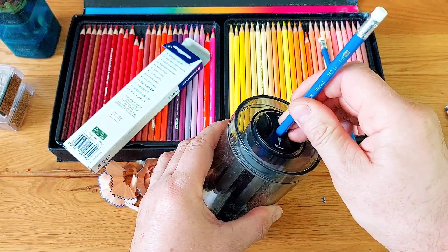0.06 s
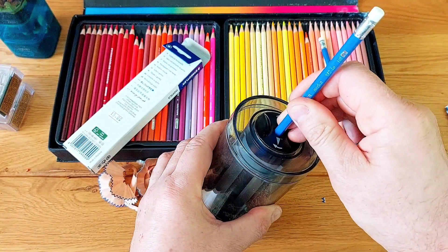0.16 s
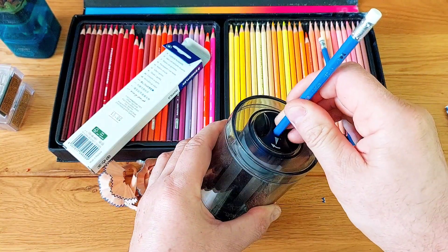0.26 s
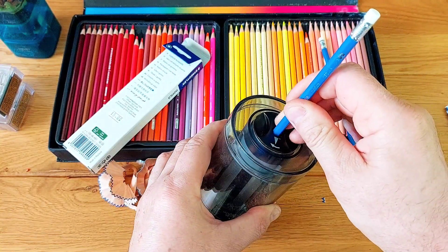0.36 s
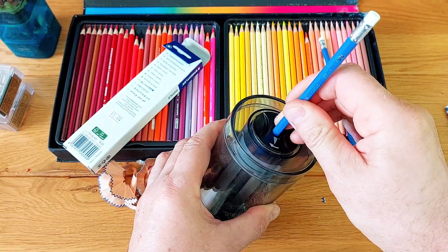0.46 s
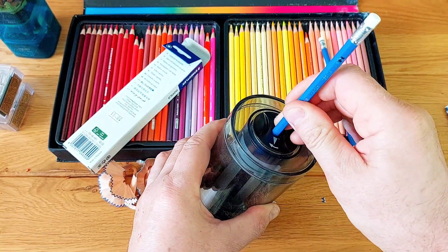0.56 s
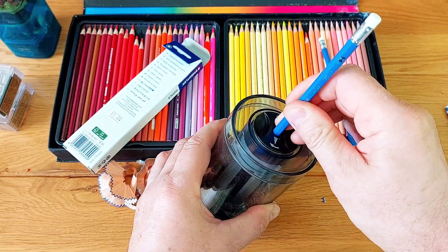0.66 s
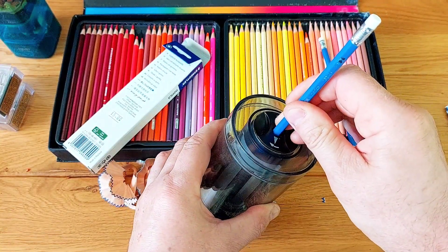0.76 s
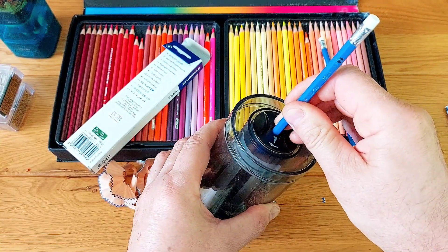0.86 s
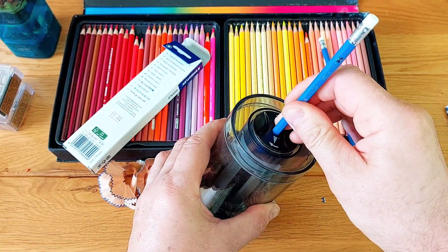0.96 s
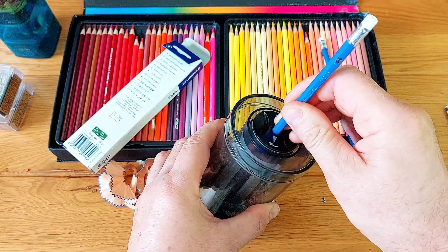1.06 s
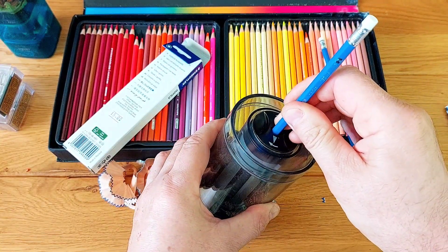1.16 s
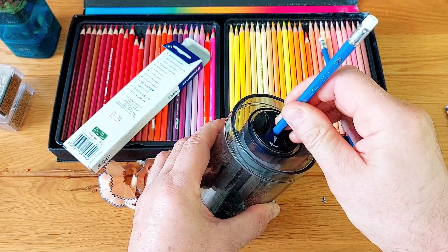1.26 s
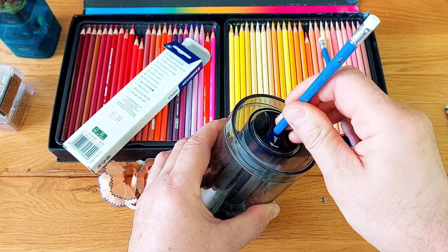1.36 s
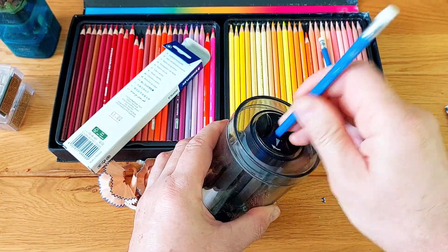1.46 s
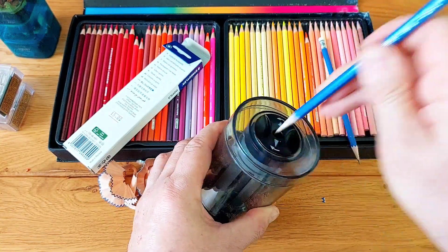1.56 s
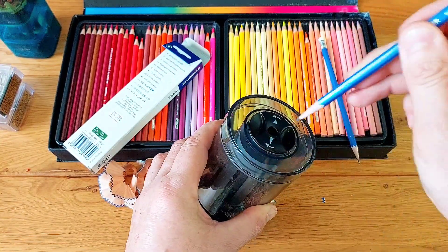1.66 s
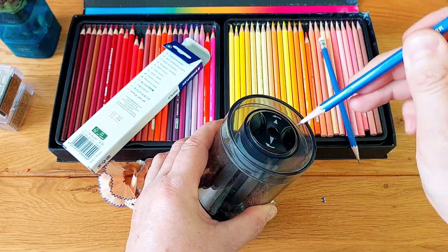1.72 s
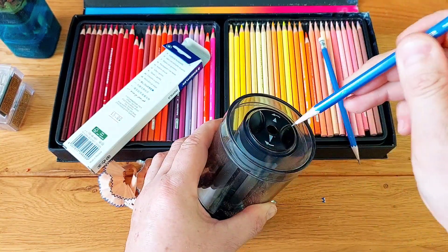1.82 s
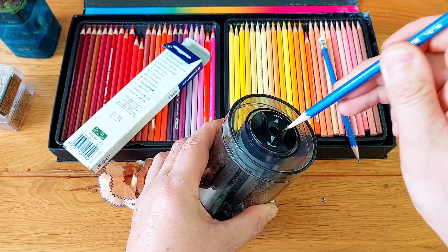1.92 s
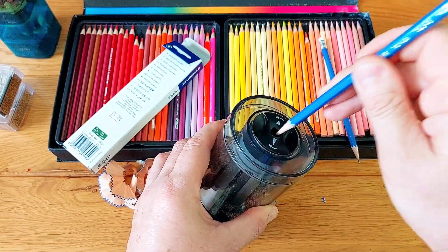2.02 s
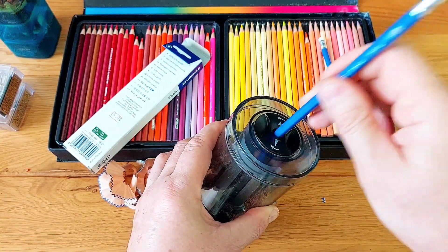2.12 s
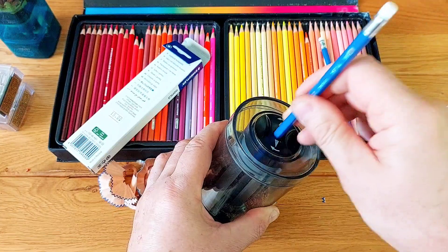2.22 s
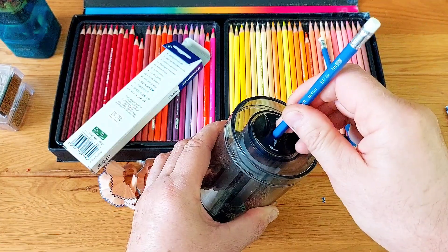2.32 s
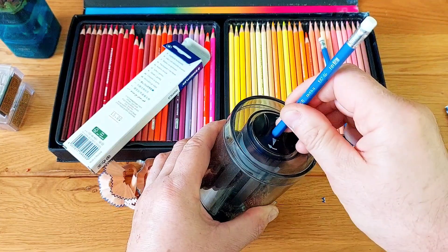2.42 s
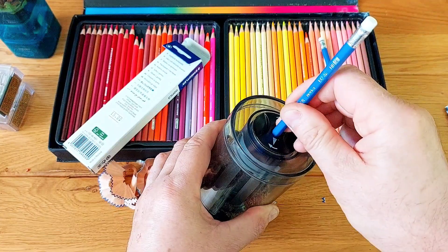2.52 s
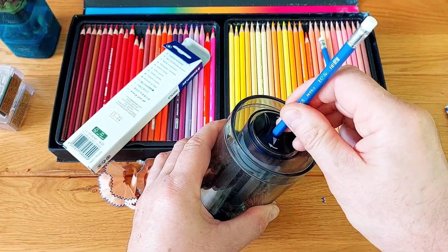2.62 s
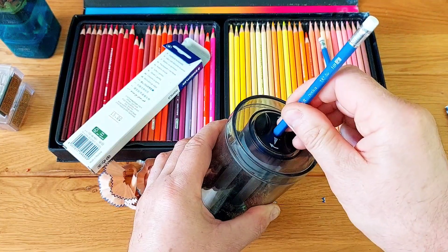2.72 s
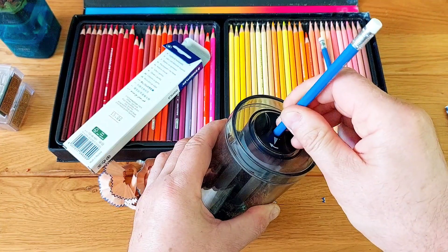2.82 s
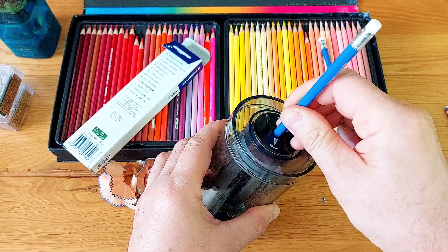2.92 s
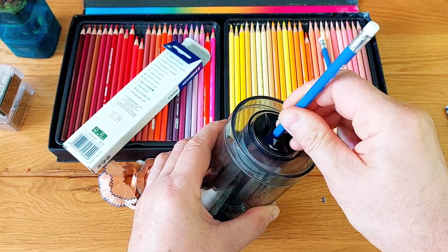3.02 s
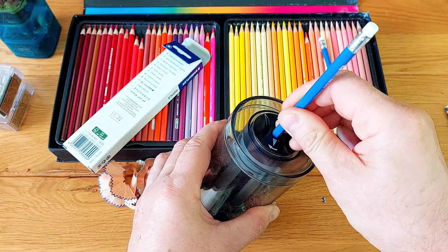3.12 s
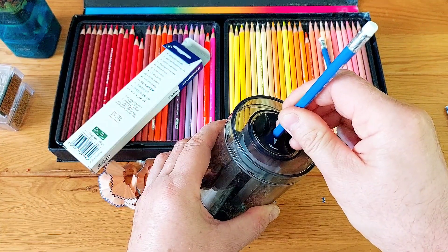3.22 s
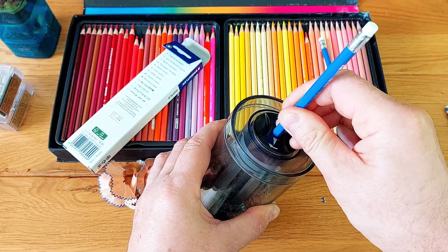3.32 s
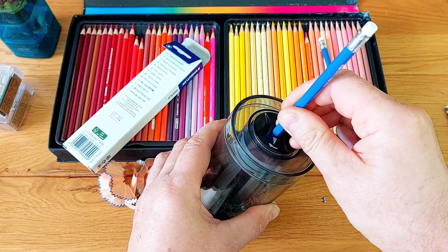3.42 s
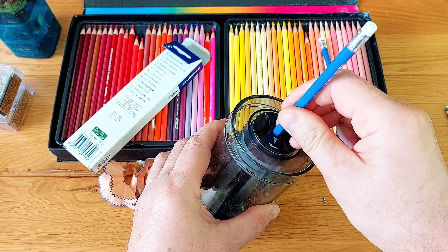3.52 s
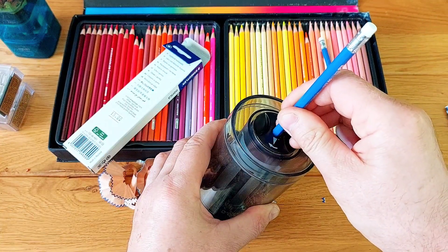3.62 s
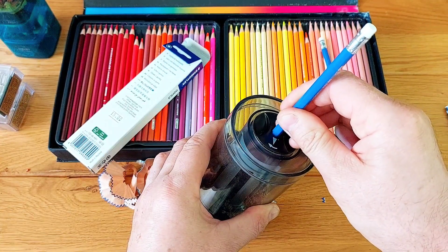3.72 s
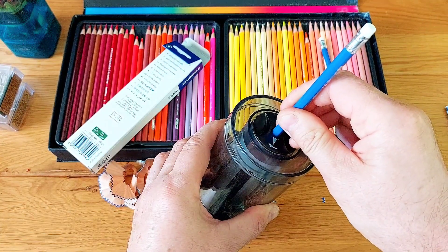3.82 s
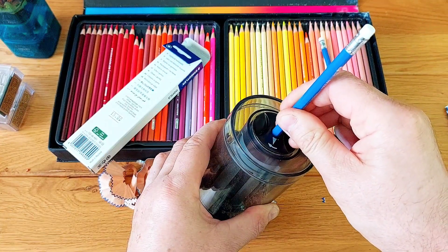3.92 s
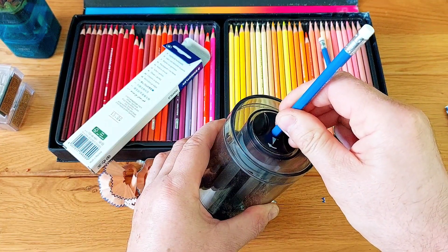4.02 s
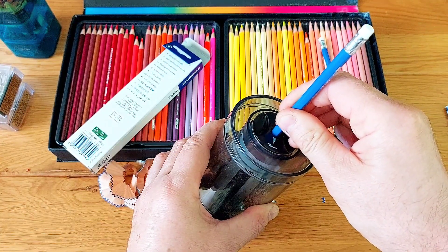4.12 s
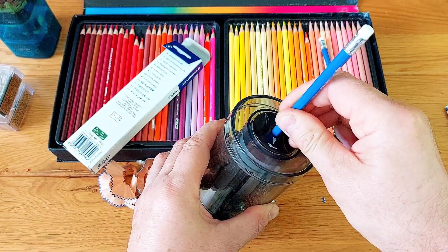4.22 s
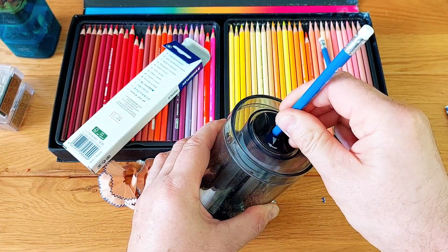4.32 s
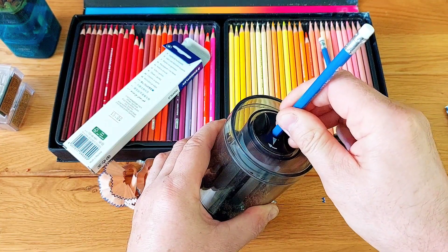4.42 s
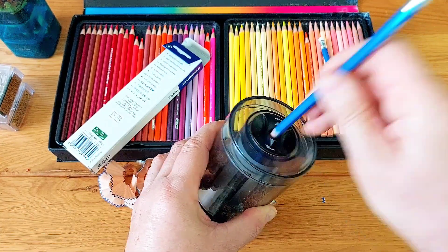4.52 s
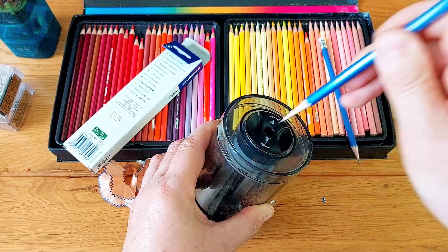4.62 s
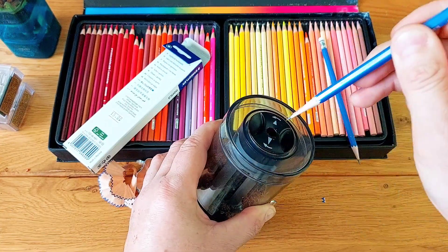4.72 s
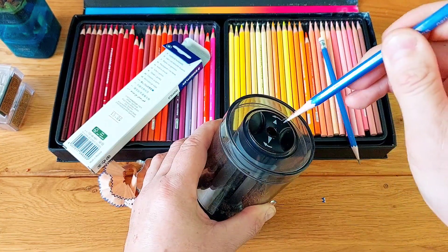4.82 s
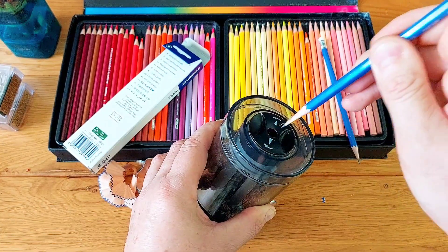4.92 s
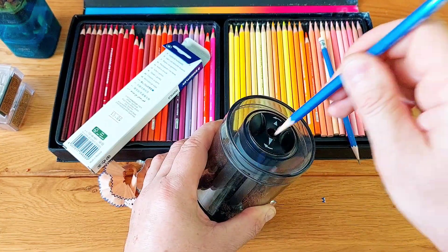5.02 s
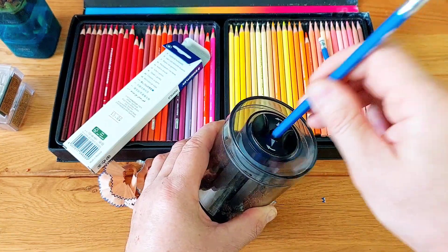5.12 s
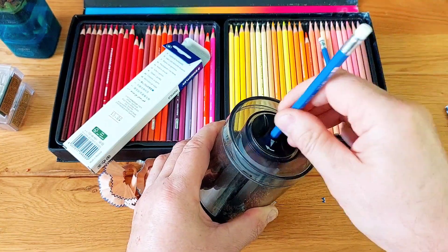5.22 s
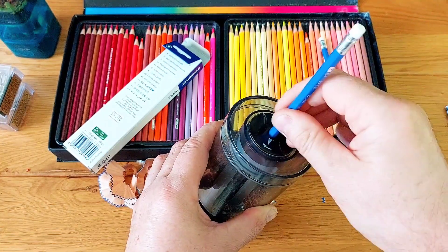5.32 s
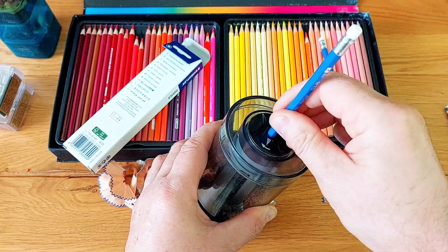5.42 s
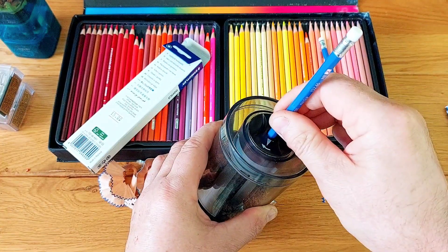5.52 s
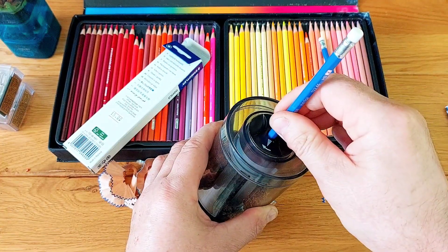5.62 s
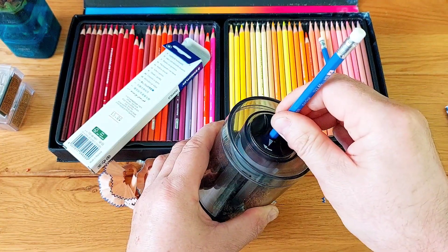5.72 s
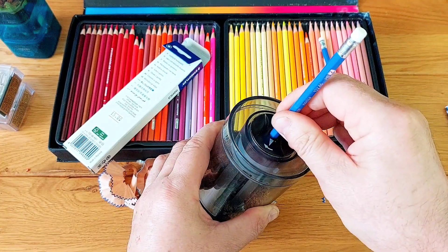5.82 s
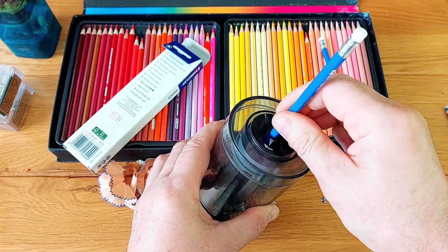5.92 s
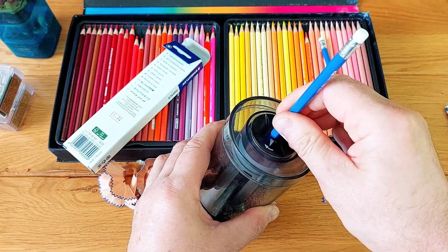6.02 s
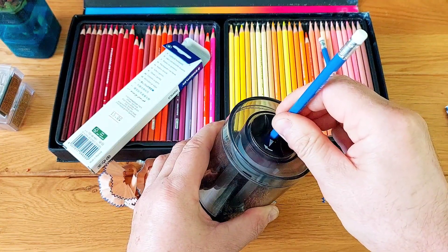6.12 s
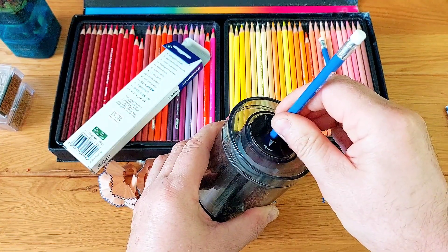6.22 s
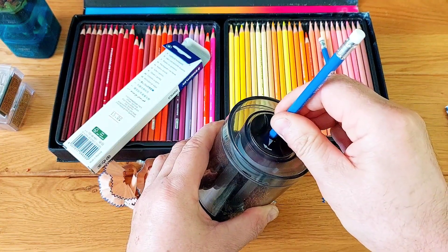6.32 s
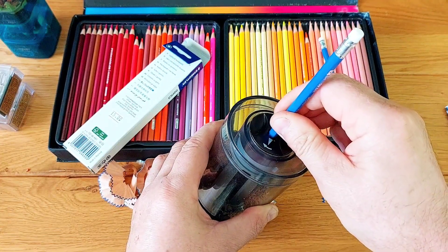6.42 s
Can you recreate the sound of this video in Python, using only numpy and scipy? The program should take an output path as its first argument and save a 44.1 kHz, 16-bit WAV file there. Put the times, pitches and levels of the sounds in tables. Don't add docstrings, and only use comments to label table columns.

```python
import sys
import numpy as np
from scipy import signal
from scipy.fft import rfft, irfft, next_fast_len
from scipy.io import wavfile
from scipy.ndimage import uniform_filter1d, map_coordinates

SR = 44100
rng = np.random.default_rng(int(sys.argv[2]) if len(sys.argv) > 2 else 0)


def decibels_to_gain(level_db):
    exponent = np.asarray(level_db, float) / 20
    return 10 ** exponent


def unload_wav(signal):
    wavfile.write(
        sys.argv[1],
        SR,
        np.round(np.clip(np.atleast_2d(signal).T, -1, 1) * 32767).astype(np.int16),
    )


N = 284886
T = np.arange(N) / SR

# t/s, peak level/dB,
# knock level/dB, mid level/dB, left-right/dB
TAPS = [(1.4057, -47, -68, -65, 0), (1.4216, -45, -37, -46, 1), (1.4787, -47, -57, -41, -3.5),
        (1.486, -41, -43, -35.5, 5), (1.5447, -36, -36, -49, 5), (1.5597, -45, -40, -50, -4),
        (1.5713, -32, -61, -41, -2), (1.8756, -62, -79.5, -86, 9), (2.016, -70, -65.5, -72.5, 13.5),
        (2.0253, -66, -60, -72.5, -9), (2.1488, -76, -60, -69, 0), (2.1722, -58, -67.5, -52, 1),
        (2.1863, -68, -36, -53, 2), (2.2675, -46, -56, -41, -2), (2.3006, -37, -31, -34, 4),
        (2.3194, -48, -47, -49.5, 3), (2.4405, -47.5, -66, -69, -7), (2.595, -54.5, -80, -70, -3),
        (2.7713, -20, -14, -29.5, 2.5)] + [(4.3346, -46, -41, -40, -3), (4.4184, -46, -62, -60, -3),
                             (4.4482, -62, -34.5, -44, 1), (4.4859, -40, -45, -38, 1),
                             (4.5134, -45.5, -64, -45, -0.5), (4.5328, -29, -47.5, -31, 0.5),
                             (4.5456, -28, -19.5, -29.5, 4), (4.604, -29.5, -43, -40, -0.5),
                             (5.163, -69, -69, -66, 1), (5.1866, -54, -62, -52, 0),
                             (5.197, -62, -59, -43, 0), (5.258, -38.5, -55, -38.5, 4.5),
                             (5.3303, -71.5, -40.5, -58, 1.5), (5.3829, -51, -51, -63, -4.5),
                             (5.7528, -54.5, -65.5, -76.5, 2)]
# f/Hz, width/Hz, level/dB
SOCKET = [(255, 44, 1.5), (183, 46, 0), (332, 60, -7)]
# f/Hz, width/Hz, level/dB
WOOD = [(830, 390, -2), (1630, 61, 3.5), (1923, 450, -6.5), (2950, 600, -6), (3880, 420, -6)]
# f/Hz, width/Hz, level/dB
RIM = [(5680, 2700, -2), (7550, 220, 0.5), (10400, 5400, -12.5), (13550, 2500, -7.5)]


def unit(x):
    return x / np.sqrt(np.mean(x ** 2) + 1e-20)


def along(points, hz):
    f, v = np.transpose(points)
    return np.interp(np.log(hz + 1), np.log(f + 1), v)


def wobble(rate):
    knots = rng.standard_normal(int(N * rate / SR) + 4)
    return map_coordinates(knots, [T * rate])


def filtered(x, response):
    m = next_fast_len(N + SR // 2)
    return irfft(rfft(x, m) * response(np.fft.rfftfreq(m, 1 / SR)), m)[..., :N]


def resonant(x, modes, fill_db=-150, low_hz=30, high_hz=20000):
    # f/Hz, correlation
    alike = [(100, 0.97), (350, 0.95), (700, .86), (1400, 0.68), (2800, 0.45), (5600, 0.25), (10000, 0.12),
             (15000, 0.15)]

    def body(f):
        total = decibels_to_gain(fill_db)
        for k, (centre, width, db) in enumerate(modes):
            mode = 1j * f * width / (centre * centre - f * f + 1j * f * width)
            total = total + (-1) ** k * decibels_to_gain(db) * mode
        return total / np.sqrt((1 + (low_hz / (f + 1)) ** 6) * (1 + (f / high_hz) ** 6))

    def response(f):
        turn = np.arccos(np.clip(along(alike, f), -1, 1)) / 2
        return body(f) * [np.cos(turn), np.sin(turn)]

    mid, side = filtered(x, response)
    return np.array([mid + side, mid - side])


def grit(per_s, spread_db):
    clicks = rng.random(N) < per_s / SR
    return clicks * decibels_to_gain(spread_db * rng.exponential(size=N)) * rng.standard_normal((2, N))


def controls(tables, outside):
    total = outside
    for table in tables:
        s, *columns = np.transpose(table)
        total = total + np.array([np.interp(T, s, c - outside, 0, 0) for c in columns])
    return total


def speed():
    # t/s, gear mesh f/Hz, whine level/dB
    course = [
        [(0, 1950, -35), (1.06, 1950, -36), (1.09, 1800, -39), (1.112, 1600, -33), (1.135, 1250, -40),
         (1.145, 1000, -48), (1.2, 600, -70)],
        [(2.73, 1270, -55), (2.752, 1280, -33), (2.785, 1480, -31), (2.805, 1850, -42), (2.83, 1950, -33),
         (4.16, 1950, -38), (4.192, 1840, -39), (4.21, 1600, -34), (4.235, 1400, -44), (4.29, 900, -62)],
        [(5.885, 1238, -55), (5.905, 1238, -36), (5.955, 1560, -35), (6.0, 1650, -40), (6.05, 1450, -35),
         (6.09, 1520, -31), (6.125, 1771, -40), (6.17, 1790, -40), (6.195, 1950, -36), (6.46, 1950, -35)],
    ]
    # t/s, overspeed/Hz, drag/s, sag/Hz, whine level/dB
    cutter_turns = [(.015, 95, .031, 60, 0), (.076, 130, .054, 170, -1), (.174, 85, .046, 135, 1),
                    (.25, 30, .047, 205, 0), (.343, 65, .036, 105, 1), (.419, 70, .044, 220, 1),
                    (.509, 30, .044, 195, 1), (.585, -45, .04, 125, 0), (.674, 22, .044, 135, 1),
                    (.758, 22, .042, 105, 1), (.83, 10, .066, 210, 3), (.944, -32, .03, 58, 0),
                    (1.014, 42, .045, 130, 1), (2.864, 60, .094, 210, 4), (3.01, -30, .028, 30, 1),
                    (3.088, 150, .033, 150, 0), (3.141, 50, .056, 250, 2), (3.235, -30, .06, 25, 1),
                    (3.325, 62, .036, 75, 2), (3.393, 135, .052, 270, 1), (3.479, -20, .037, 85, -1),
                    (3.568, 78, .042, 115, 1), (3.658, 100, .035, 65, 1), (3.73, 62, .048, 240, 1),
                    (3.818, 0, .066, 62, 1), (3.908, 15, .021, 55, 0), (3.983, 138, .04, 270, 2),
                    (4.059, -20, .038, 220, -2), (6.208, 48, .038, 70, 2), (6.286, 85, .05, 200, 1),
                    (6.357, -18, .045, 150, 1)]
    free_s, idle_s = .04, .2
    s, hz, whine_db = np.transpose(np.vstack(course))
    start, over_hz, drag, sag_hz, turn_db = np.transpose(cutter_turns)
    caught = start + drag
    gap = np.diff(start, append=np.inf) > idle_s
    knots = np.concatenate([start, caught, caught[gap] + free_s, start[1:][gap[:-1]] - free_s])
    order, rest = np.argsort(knots), np.zeros(2 * gap.sum() - 1)

    def ripple(at_start, at_sag):
        return np.interp(T, knots[order], np.concatenate([at_start, at_sag, rest])[order])

    running_db = controls([np.array(burst)[:, [0, 2]] for burst in course], -150)[0]
    mesh_hz = np.interp(T, s, hz) + ripple(over_hz, over_hz - sag_hz)
    return mesh_hz, running_db + ripple(turn_db, turn_db - 2.5)


def gears():
    # f/Hz, level/dB
    cap = [(2000, -12.5), (3200, -1), (3650, 1), (4200, 3), (4900, 0.5), (5400, 3), (6100, -8), (7000, -15)]
    hz, whine_db = speed()
    hz = uniform_filter1d(hz, size=500)
    load = -np.tanh(np.gradient(hz) * SR / 1800)
    cycles = np.cumsum(hz * (1 + .011 * wobble(110))) / SR
    first = decibels_to_gain(5 * np.minimum(load, .3)) * decibels_to_gain(whine_db)
    octave = first * decibels_to_gain(-36 * (1 - hz / hz.max()))
    levels = [first, octave * decibels_to_gain(along(cap, 2 * hz)), decibels_to_gain(0.5) * octave * decibels_to_gain(along(cap, 3 * hz))]
    runout = 1 + .3 * np.sin(2 * np.pi * cycles / 10.3)
    lead = np.array([[1], [-1]]) * (0.42 + 0.39 * wobble(16))
    whine = 0
    for k, level in enumerate(levels):
        flutter = decibels_to_gain(3.2 * wobble(85) - .5)
        whine = whine + level * flutter * np.sin(2 * np.pi * (k + 1) * cycles + (-1) ** k * lead)
    return cycles, decibels_to_gain(5.5) * runout * whine


def bites():
    # t/s, peak level/dB
    blade_bites = [(0.0248, -16), (0.0498, -18.5), (0.0897, -19.5), (0.1296, -17), (0.1506, -23.5), (0.1725, -24),
                   (0.1895, -21.5), (0.2084, -18.5), (0.2359, -17.5), (0.2808, -16.5), (0.3012, -16.5),
                   (0.3436, -17), (0.4065, -17.5), (0.4244, -14), (0.4544, -18.5), (0.4723, -20.5), (0.5033, -19),
                   (0.5172, -16.5), (0.5357, -17), (0.5611, -19.5), (0.5776, -19), (0.599, -15), (0.619, -17),
                   (0.6424, -20.5), (0.6659, -19), (0.6923, -14.5), (0.7572, -15.5), (0.815, -15), (0.8345, -17),
                   (0.8699, -17), (0.8939, -19), (0.9163, -25), (0.9373, -20.5), (0.9577, -17.5), (1.0101, -17),
                   (1.061, -17), (1.0859, -16.5), (1.1348, -24.5),
                   (2.7588, -20), (2.7842, -18.5), (2.806, -16.5), (2.848, -15), (2.8683, -17), (2.9125, -19),
              (2.9319, -14), (2.9631, -20), (2.9818, -17.5), (3.0047, -20), (3.0287, -17), (3.1, -15),
              (3.1268, -18.5), (3.146, -19), (3.1644, -18), (3.1812, -19), (3.2339, -18), (3.2527, -16.5),
              (3.311, -19), (3.3327, -20), (3.3904, -20), (3.4063, -16), (3.4245, -16), (3.4742, -18.5),
              (3.4989, -15.5), (3.5625, -13), (3.6164, -17.5), (3.6442, -15), (3.6842, -15),
              (3.7052, -17.5), (3.7286, -17.5), (3.7491, -18.5), (3.777, -22), (3.795, -24), (3.8174, -18),
              (3.8379, -18.5), (3.8559, -20.5), (3.8918, -16.5), (3.9482, -19.5), (3.9686, -19.5),
              (3.9843, -20), (4.0039, -17.5), (4.0228, -14), (4.0591, -19), (4.0805, -16.5),
              (4.1174, -20.5), (4.1413, -19), (4.207, -21.5), (4.228, -25),
                   (5.9094, -22), (5.9383, -19.5), (5.9603, -17.5), (5.9827, -17), (6.0211, -14.5), (6.054, -17.5),
            (6.081, -21), (6.1103, -14.5), (6.1314, -12), (6.1947, -18.5), (6.2172, -17.5), (6.3044, -18),
            (6.3214, -17.5), (6.358, -19.5), (6.3803, -16.5), (6.3977, -15.5), (6.4436, -17.5)]
    bite_s, between = 0.01, 0.85
    s, db = np.transpose(blade_bites)
    u = np.arange(round(3 * bite_s * SR)) / (bite_s * SR / 4)
    marks = np.bincount((s * SR).astype(int), decibels_to_gain(db + 14.5), minlength=N)[:N]
    swell = signal.fftconvolve(marks, u * np.exp(1 - u))[:N]
    return 20 * np.log10(between + abs(swell))


def shell_hum(cycles, shake, shake_db):
    # f/Hz, width/Hz, level/dB
    held_modes = [(98, 18, -4), (191, 39, -1), (310, 50, -3.5), (418, 52, -3), (614, 78, -10),
                  (913, 110, -11.5)]
    shaft = decibels_to_gain(5.0 * np.sin(2 * np.pi * cycles / 10.3 + wobble(30)))
    push = decibels_to_gain(0.4 * shake + 0.49 * wobble(8.2)) * shaft * rng.standard_normal((2, N))
    level = decibels_to_gain(-28.5 + shake_db - 0.5 + 0.59 * wobble(22))
    return level * unit(resonant(push, held_modes, -26.0, 34, 1200))


def grinding(hard, shake, cut_db):
    # f/Hz, width/Hz, level/dB
    wall_modes = [(1536, 240, -11.5), (2146, 530, -5.5), (2536, 410, -10), (3835, 290, -5.5),
                  (4800, 250, -13.5)]
    tearing = decibels_to_gain(0.34 * hard + 0.87 * shake + 1.1 * wobble(150)) * grit(12000, 0.52)
    level = decibels_to_gain(-0.5) * decibels_to_gain(-27.5 + cut_db + wobble(20))
    return level * unit(resonant(tearing, wall_modes, -18, 540, 6000))


def blade_hiss(hard, shake, cut_db):
    # f/Hz, width/Hz, level/dB
    steel_modes = [(5438, 420, -3), (5915, 350, 0), (7686, 280, -7)]
    # f/Hz, width/Hz, level/dB
    chip_modes = [(9870, 2100, -19), (11680, 710, -11.5), (14000, 3600, -22.5)]
    edge = decibels_to_gain(hard + 0.14 * shake + 2.0 * wobble(180)) * grit(14000, 0.79)
    steel = unit(resonant(edge, steel_modes, -44, 4900, 8600))
    chips = unit(resonant(edge, chip_modes, -30.5, 8500))
    return decibels_to_gain(-28.5 + 1.2 * cut_db + wobble(23)) * steel + decibels_to_gain(-37.5 + 2.6 * cut_db) * chips


def jolts():
    # t/s, peak level/dB, f/Hz
    jerks = [(0.03, -21, 212.8), (0.067, -24.5, 187.6), (0.115, -24, 178.7), (0.22, -23, 205.9),
             (0.289, -19.5, 406.7), (0.399, -22, 419.6), (0.498, -24.5, 205), (0.578, -19, 199.4),
             (0.646, -21, 194), (0.694, -22, 200.8), (0.766, -20, 172.7), (0.824, -19, 191),
             (0.963, -21.5, 240), (1.104, -23, 398), (2.935, -22, 272), (3.112, -17.5, 191),
             (3.246, -24.5, 172), (3.406, -17.5, 417), (3.688, -21.5, 202), (3.731, -20, 199),
             (3.825, -20.5, 172), (3.961, -22, 396), (4.001, -19, 161), (4.132, -23.5, 425),
             (4.17, -26.5, 170), (5.926, -22, 205), (6.0, -17, 405.5), (6.033, -13.5, 208.5),
             (6.101, -17, 242), (6.212, -18.5, 167.4), (6.313, -21.5, 314.4), (2.875, -20, 610),
             (2.775, -19, 190), (3.15, -21, 170), (4.07, -25, 620)]
    t60_s = .14
    out, t = np.zeros(N + SR), np.arange(SR // 8) / SR
    for (s, db, hz), turn in zip(jerks, rng.random(len(jerks))):
        envelope = decibels_to_gain(db - 60 * t / t60_s) * (1 - np.exp(-t / 0.0087))
        out[round(s * SR):][:len(t)] += envelope * np.sin(2 * np.pi * (hz * t + turn))
    return out[:N]


def sharpener():
    # t/s, cutting level/dB, shaking level/dB
    effort = [
        [(0, 1, -1.5), (.33, 0, -2.5), (.7, -0.5, -1.5), (1.04, 0.5, 1.5), (1.132, -1, -2.5),
         (1.172, -16.5, -13.5), (1.212, -13, -28), (1.25, -29, -31), (1.39, -58, -90.5)],
        [(2.708, -60.5, -55), (2.727, -6.5, -25), (2.768, -1, -4), (2.83, 0, -1), (4.2, 0, -1),
         (4.261, -4.5, -5), (4.293, -21, -13.5), (4.333, -13.5, -26), (4.4, -40.5, -41)],
        [(5.87, -61, -61.5), (5.882, -17.5, -34), (5.91, -2, -7), (5.97, 0, -3), (6.04, 0, 5), (6.104, 0, -1),
         (6.3, 1, -1.5), (6.4, -0.5, 5), (6.46, -0.5, -1.5)],
    ]
    cycles, whine = gears()
    cut_db, shake_db = controls(effort, -120)
    hard, shake = bites(), wobble(14)
    cutting = grinding(hard, shake, cut_db) + blade_hiss(hard, shake, cut_db)
    return shell_hum(cycles, shake, shake_db) + cutting + jolts() + whine


def room_tone():
    # f/Hz, level/dB per Hz
    quiet = [(12, -39.5), (20, 0), (65, 8.5), (110, 3), (135, -12), (558, -27.5), (1700, -34.5),
             (16000, -46.5)]
    # t/s, rumble level/dB
    sways = [(1.3, -59), (1.5, -48), (1.66, -57.5), (1.88, -63), (2.03, -65), (2.31, -51), (2.58, -60),
             (4.56, -51), (5.06, -64), (5.2, -62.5), (5.39, -57), (5.66, -58.5), (5.83, -62.5)]
    still_db, sway_db_per_s = -74, 89.5

    def far(f):
        sides = [np.ones_like(f), np.clip(0.15 + f / 1500, 0, 1)]
        return decibels_to_gain(along(quiet, f)) / (1 + (f / 1500) ** 4) * sides

    mid, side = filtered(rng.standard_normal((2, N)), far)
    sway_db = np.max([db - sway_db_per_s * abs(T - s) for s, db in sways], axis=0)
    level = decibels_to_gain(sway_db.clip(still_db)) * decibels_to_gain(2.2 * wobble(9))
    rumble = level * unit(np.array([mid + side, mid - side]))
    return rumble + decibels_to_gain(-88 + 6.0) * rng.standard_normal((2, N))


def taps():
    length = 900
    crack, ring, knock = np.zeros((3, 2, N + length))
    aim_db = np.zeros(N + length)
    t = np.arange(length) / SR
    push = np.sin(np.pi * np.clip(t / 0.0015, 0, 1))
    for s, db, knock_db, mid_db, pan_db in TAPS:
        at = slice(round(s * SR), round(s * SR) + length)
        crack[:, at] += decibels_to_gain(db + 2 - 60 * t / .018) * rng.standard_normal((2, length))
        ring[:, at] += decibels_to_gain(mid_db + 16 - 60 * t / .014) * rng.standard_normal((2, length))
        knock[0, at] += decibels_to_gain(knock_db + 5.5) * push
        aim_db[at] = pan_db / 2
    bright = resonant(crack[:, :N], RIM, -17.5, 3000) + resonant(ring[:, :N], WOOD, -30.0, 200, 6000)
    return bright * decibels_to_gain([aim_db[:N], -aim_db[:N]]) + resonant(knock[:, :N], SOCKET)


def contact_dip():
    dip = sum(np.exp(-((T - s + .007) / .006) ** 2) * (T < s) for s in np.transpose(TAPS)[0])
    return decibels_to_gain(-6 * np.clip(dip, 0, 1))


def strokes(rows, lasts):
    silent = (-200, -200, 1)
    s, a_db, b_db, t60 = np.transpose([(0, *silent), *rows, (N / SR + 1, *silent)])
    now = np.searchsorted(s, T, side="right") - 1
    dying = np.array([a_db[now], b_db[now]]) - 60 * (T - s[now]) / (abs(t60[now]) * [[lasts], [1]])
    rise_db_per_s = 3001.5
    coming = np.array([a_db[now + 1], b_db[now + 1]]) - rise_db_per_s * (s[now + 1] - T)
    return decibels_to_gain(np.maximum(dying, coming))


def tip_slide(slips):
    # t/s, squeak level/dB, hiss level/dB, t60/s
    tip_strokes = [(1.41, -75, -68.5, 0.19), (1.484, -60.5, -65.5, .4), (1.546, -40.5, -58, .05),
                   (1.561, -41, -58, .05), (1.575, -40, -45, 0.026), (1.595, -63.5, -69, .3),
                   (1.878, -95, -84, .15), (2.03, -91.5, -84, .9), (2.11, -84, -90, 3),
                   (2.184, -72, -75, 0.37), (2.27, -62, -54.5, 0.16), (2.298, -56.5, -63, .2),
                   (2.316, -79, -67, 0.29), (2.438, -80.5, -71.5, .17), (4.416, -78, -65, .25),
                   (4.516, -74, -54, .5), (4.546, -45, -45, .2), (4.6, -50, -54, 0.063),
                   (4.634, -78.5, -75.5, 0.43), (5.115, -89, -95, 3), (5.163, -71, -87, .4),
                   (5.188, -72, -68, .5), (5.208, -70, -59.5, 0.6), (5.229, -74, -67, .6),
                   (5.26, -61, -67, .06), (5.274, -82, -77, .4), (5.386, -79, -70, 0.17),
                   (5.75, -80.5, -79.5, 0.26)]
    # f/Hz, width/Hz, level/dB
    guide_modes = [(7520, 140, 0)]
    squeak, hiss = strokes(tip_strokes, 0.91)
    guide = unit(resonant(slips * grit(6000, 1.5), guide_modes, low_hz=6500, high_hz=8440))
    rim = unit(resonant(slips * grit(9000, 1.5), RIM, low_hz=4080))
    return decibels_to_gain(2.5) * squeak * guide + decibels_to_gain(4.0) * hiss * rim


def side_rub(slips):
    # t/s, thrum level/dB, scrape level/dB, t60/s
    side_strokes = [(1.42, -42.5, -59.5, 0.35), (1.486, -38.5, -44, 0.18), (1.548, -53, -46.5, 0.14),
                    (1.576, -56, -49.5, 0.1), (2.048, -66, -85.5, .5), (2.105, -70, -78.5, 3),
                    (2.15, -64, -65, 2), (2.186, -45, -56, 0.33), (2.27, -35, -42, 0.18),
                    (2.312, -33.5, -36.5, 0.091), (2.38, -54.5, -82, .8), (2.438, -56.5, -73, 0.11),
                    (2.46, -75, -78, 2), (4.4, -62, -57, 0.18), (4.458, -47, -62, 0.69),
                    (4.546, -29.5, -33, .15), (4.604, -42, -40.5, 0.093), (4.634, -56.5, -58.5, 0.2),
                    (4.95, -81, -98, 3), (5.16, -64.5, -66, 0.68), (5.194, -48.5, -52, 0.41),
                    (5.26, -48, -44.5, 0.075), (5.274, -44.5, -54.5, 0.25), (5.335, -50.5, -56.5, 0.13),
                    (5.468, -70, -96, 2.2), (5.75, -76, -80, .4)]
    thrum, scrape = strokes(side_strokes, 2.1)
    barrel = unit(resonant(rng.standard_normal((2, N)), SOCKET))
    wood = unit(resonant(slips * grit(11000, 0.73), WOOD, -31.5, 400, 3600))
    return decibels_to_gain(-2.0) * thrum * barrel + decibels_to_gain(0.5) * scrape * wood


def slide():
    slips = decibels_to_gain(2.2 * wobble(120))
    return tip_slide(slips) + side_rub(slips)


def space(x):
    # f/Hz, t60/s
    decay = [(150, 0.43), (2000, 0.18), (5000, 0.014), (14000, 0.14)]
    # f/Hz, level/dB
    scatter = [(100, -37), (400, -21), (1000, -21), (3000, -7.5), (8000, -7), (15000, -4.5)]
    # f/Hz, left-right/dB
    tilt = [(100, 0.5), (1000, 0), (3500, 3.5), (8000, -3), (15000, -4)]
    # f/Hz, share
    quarter = [(500, 0), (2000, .12), (5000, .45), (15000, .35)]
    hz, t, z = signal.stft(rng.standard_normal((2, SR // 2)), SR, nperseg=256)
    tail = signal.istft(z * decibels_to_gain(-60 * t / along(decay, hz)[:, None]), SR, nperseg=256)[1]
    tail *= decibels_to_gain(np.interp(np.arange(tail.shape[1]) / SR, [0, .007, .012], [-80, -80, 0]))
    room = signal.fftconvolve(x, tail / np.linalg.norm(tail[0]), axes=1)[:, :N]
    twist = filtered(x.mean(axis=0), lambda f: 1j * along(quarter, f))
    direct = filtered(x + [twist, -twist], lambda f: decibels_to_gain(along(tilt, f) * [[.5], [-.5]]))
    return direct + filtered(room, lambda f: decibels_to_gain(along(scatter, f)))


def scene():
    return space(sharpener() + contact_dip() * slide() + taps()) + room_tone()


def low_pass(x):
    return signal.sosfilt(signal.butter(12, 16670, fs=SR, output="sos"), x)


def record(dry):
    mix = filtered(dry, lambda f: np.clip((16050 - f) / 300, 0, 1) ** 2)
    return low_pass(mix)


dry = scene()
out = record(dry)
unload_wav(out)
```